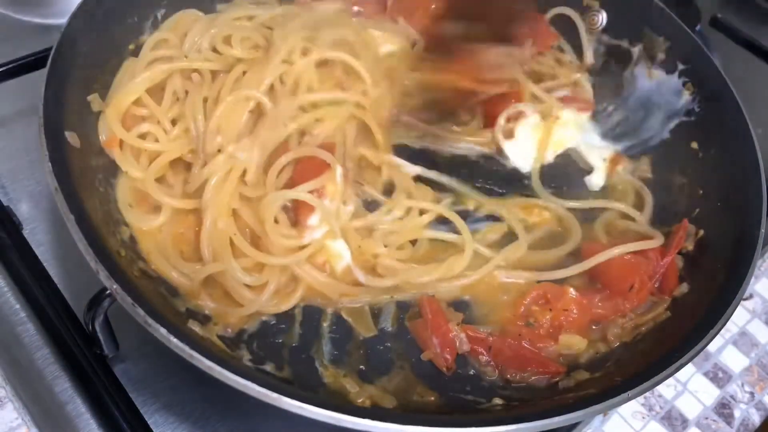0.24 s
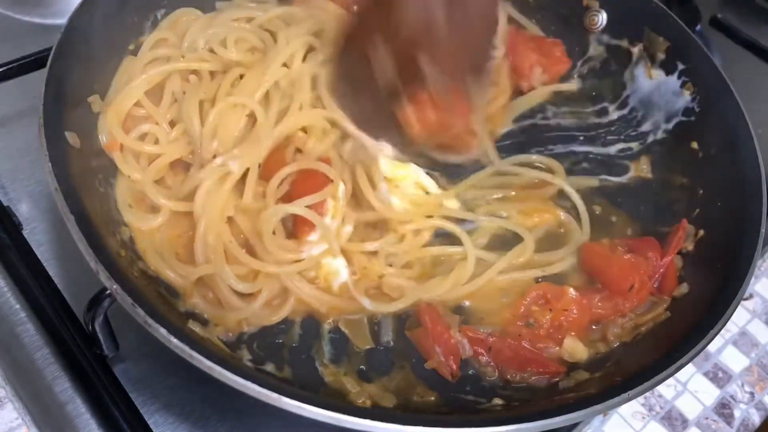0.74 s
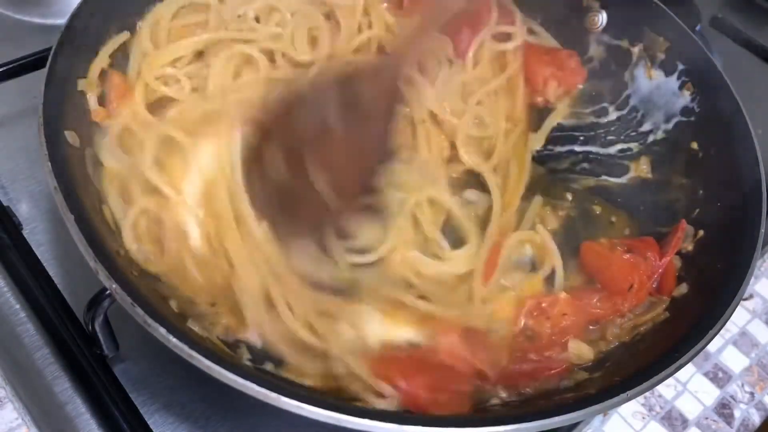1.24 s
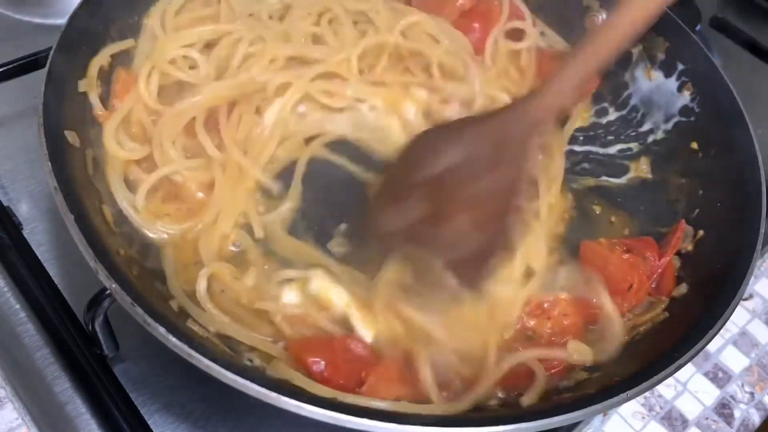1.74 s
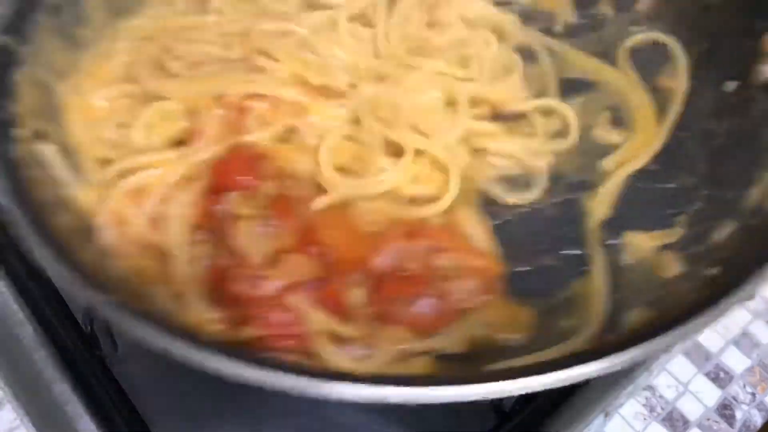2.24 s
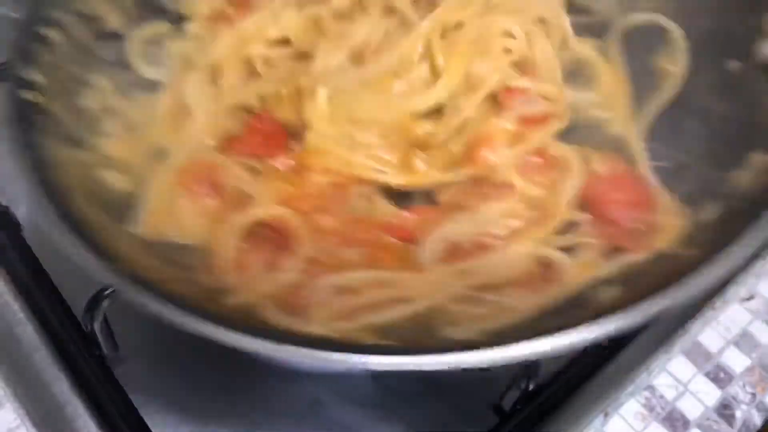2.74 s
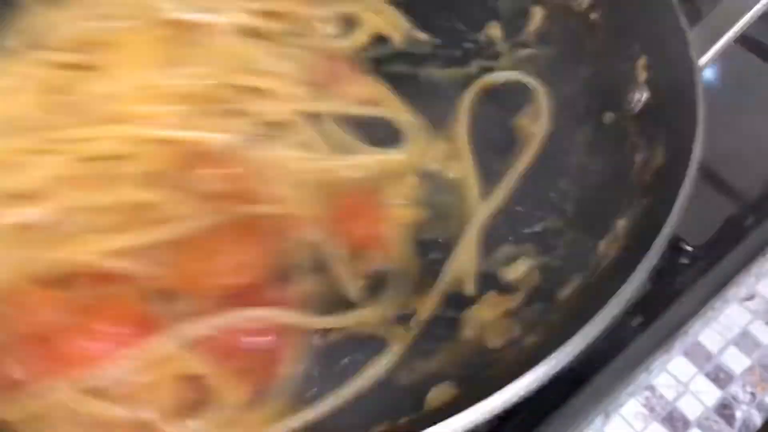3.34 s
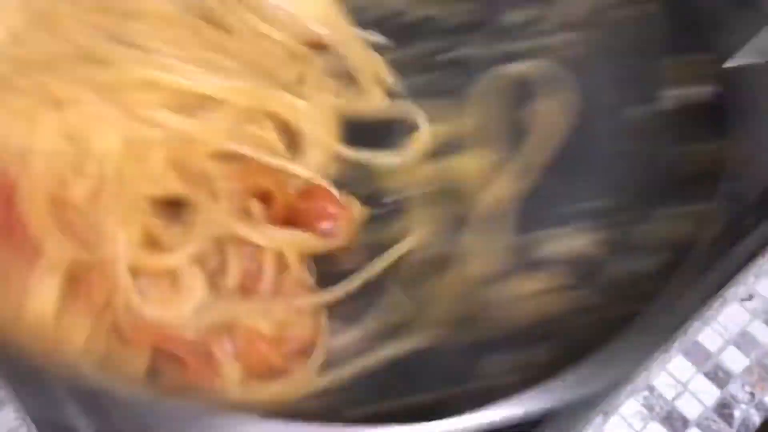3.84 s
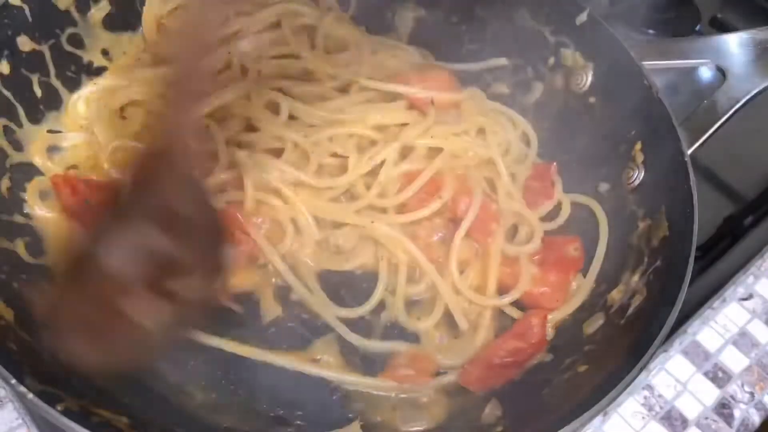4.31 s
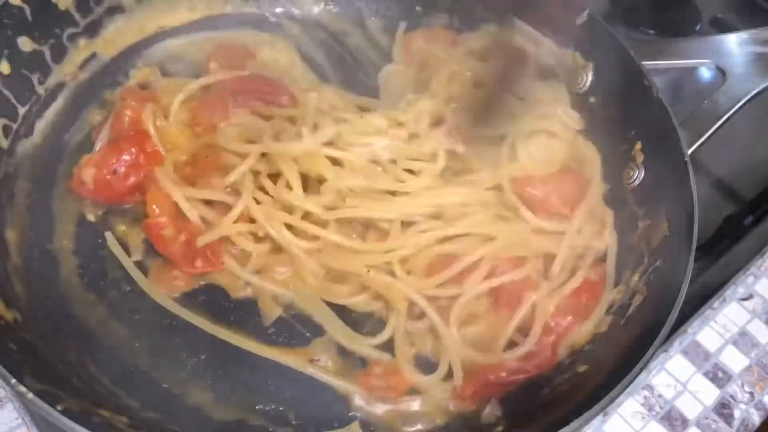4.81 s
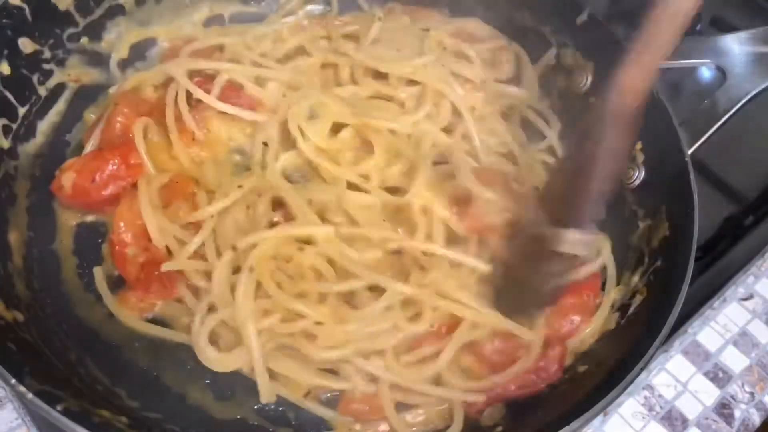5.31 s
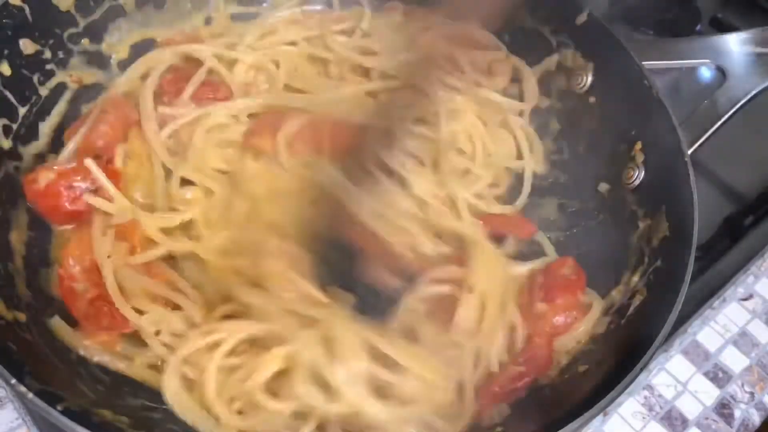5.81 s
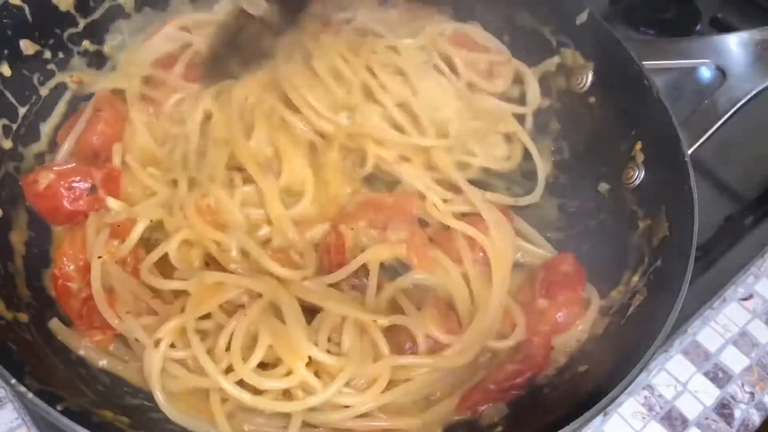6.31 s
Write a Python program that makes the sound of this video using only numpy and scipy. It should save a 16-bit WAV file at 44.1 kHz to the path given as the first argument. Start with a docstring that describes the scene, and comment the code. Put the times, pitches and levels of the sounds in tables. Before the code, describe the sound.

Close up in a small, hard kitchen, a wooden spoon stirs wet spaghetti in a frying pan. Sticky crackles and small smacks mix with hollow knocks and juddering scrapes. The pan is then jerked repeatedly, the pasta sliding and landing in loud wet swishes and slaps. A knock and ringing sweep round the wall follow, then quieter squelching stirs and a crisp woody tap near the end.

```python
"""On a kitchen hob, spaghetti in tomato sauce is stirred with a wooden spoon and tossed in a frying pan.
The wet strands crackle, smack and slap down: many tiny bursts of sound, merging into a swish of noise.
The spoon knocks on the pan and judders over its bottom: dying sine waves and short rattles of noise.
A small hard kitchen answers with dense, quickly fading echoes, over a faint low drone."""
import sys
import numpy as np
from scipy import signal
from scipy.fft import rfft, irfft
from scipy.io import wavfile
from scipy.ndimage import uniform_filter1d

SR = 44100
rng = np.random.default_rng(int(sys.argv[2]) if len(sys.argv) > 2 else 0)


def unload_audio(sound):
    """Save the sound as a 16-bit wav file, at the path given as the first command line argument."""
    columns = np.transpose(np.atleast_2d(sound))
    # keep every value between -1 and 1, then stretch to whole-number steps
    steps = np.round(np.clip(columns, -1, 1) * 32767)
    wavfile.write(sys.argv[1], SR, steps.astype(np.int16))


N = 289294
TIME = np.arange(N) / SR  # seconds

# Still air. Each row: frequency in Hz, relative strength in dB per Hz.
AIR_COLOUR = [(20, -14), (60, -13), (150, 13.5), (400, -1.5), (700, 13), (1500, 3), (4000, -4.5),
              (10000, -20), (16000, -6)]
# Low rumble. Each row: frequency in Hz, relative strength in dB per Hz.
RUMBLE_COLOUR = [(20, -43), (40, -1), (60, -7.5), (90, 3.5), (130, -7), (200, -3), (350, -7.5), (700, -30),
                 (2000, -75)]
# The pan shifts on the hob. Each row: start in seconds, length in seconds, rumble level in dB.
SHIFTS = [(0.456, 0.11, -51), (0.843, 0.31, -61.5), (1.493, 0.19, -60), (1.854, 0.6, -61.5),
          (4.696, 0.023, -58.5)]
# The pan drags on its support with a low groan.
# Each row: start in seconds, length in seconds, level in dB, first and last pitch in Hz (before it trembles).
GROANS = [(0.833, .01, -52, 160, 144), (0.95, 0.056, -49, 78, 85.7), (1.092, .2, -55.5, 91, 98),
          (1.832, 0.23, -55.5, 222, 209.3)]
# The wet sauce. Each row: frequency in Hz, relative strength in dB per Hz.
SAUCE_COLOUR = [(150, -7), (400, -19.5), (800, -5.5), (1400, 3), (2500, 1.5), (4000, 3), (7000, 4.5),
                (11000, 5), (14000, 0.5), (16500, -35)]
# The spoon pushes through the strands; thin films sound brighter than the heavy mass.
# Each row: start in seconds, length in seconds, relative level in dB, treble tilt in dB per octave.
STIRS = [(0.414, 0.039, -46.5, -16), (0.444, 0.16, -53, -7.5), (0.792, 0.033, -47.5, -2.5),
         (0.932, 0.29, -54, -5), (1.252, 0.15, -49.5, -4.5), (1.492, 0.0063, -45, -6),
         (1.575, 0.16, -56, -4.5), (2.562, 0.16, -53.5, -5), (4.27, 0.42, -56, -7.5),
         (4.525, 0.12, -53.5, -2.5), (4.906, 0.11, -49.5, -5), (5.169, 0.0024, -42, -5.5),
         (5.215, 0.44, -59.5, -4.5), (5.418, 0.033, -47.5, 0), (5.633, 0.39, -59, -2),
         (5.862, 0.011, -46.5, 9), (6.058, 0.088, -55.5, -7), (6.16, 0.031, -53, -6),
         (6.263, 0.019, -43.5, -3), (6.419, 0.086, -53, -4)]
# The pan is jerked and the whole mass slides off or lands, then the strands settle.
# Each row: start in seconds, length in seconds, relative level in dB, treble tilt in dB per octave,
# relative level of the settling in dB.
TOSSES = [(1.999, 0.017, -42, -4, -46.5), (2.199, 0.091, -43, -8, -80), (2.52, 0.011, -41.5, -5.5, -54),
          (2.722, 0.037, -35, -5.5, -53), (3.009, 0.012, -50, -7, -42), (3.145, 0.092, -42, -8, -49.5),
          (3.446, 0.038, -38.5, -4.5, -44), (3.636, 0.05, -37.5, -8.5, -48.5), (3.92, 0.02, -40.5, -6, -85)]
# Single large sauce films and air pockets that burst.
# Each row: time in seconds, relative level in dB, pitch in Hz.
SMACKS = [(.044, -21.5, 4200), (.0445, -28.5, 1840), (.1832, -25, 6900), (.192, -24.5, 4200),
          (.4195, -21.5, 6530), (.4215, -19.5, 3380), (.7801, -30.5, 6600), (.8, -22, 12500),
          (.8287, -27.5, 4400), (.8465, -25.5, 4830), (.9874, -31.5, 4400), (1.2892, -21.5, 9000),
          (1.3222, -30, 2270), (1.3567, -31, 2640), (1.494, -30, 4420), (1.5888, -20.5, 7000),
          (1.5918, -22.5, 6100), (1.983, -26, 7000), (2.002, -18, 10000), (2.068, -28.5, 3550),
          (2.219, -20.5, 8300), (2.2505, -18.5, 2820), (2.2678, -11, 7070), (2.498, -28, 10300),
          (2.513, -28.5, 4760), (2.7337, -18, 3930), (2.7468, -17.5, 5500), (2.995, -29, 11700),
          (3.0006, -27.5, 3270), (3.0127, -23.5, 10500), (3.1445, -24, 1890), (3.156, -22, 2150),
          (3.2344, -13.5, 5150), (3.2364, -12.5, 10400), (3.438, -18, 5750), (3.458, -17, 5140),
          (3.461, -26, 488), (3.473, -17.5, 6750), (3.61, -23.5, 3030), (3.6274, -32, 4370),
          (3.6505, -20.5, 3270), (3.682, -17, 2520), (3.899, -28, 11200), (3.93, -18.5, 4750),
          (3.945, -30.5, 450), (4.173, -17.5, 2720), (4.463, -28.5, 1850), (4.583, -29.5, 3460),
          (4.916, -26.5, 2240), (5.171, -23, 6850), (5.4518, -23.5, 1560), (5.611, -28.5, 6560),
          (6.1844, -24.5, 9000)]
# The pan, damped by the food and the spoon.
# Each row: basic frequency in Hz, relative level in dB, basic time to fade by 60 dB in seconds.
PAN_MODES = [(555, -29.5, 0.26), (536, -4.5, 0.032), (690.9, 3, 0.13), (775, 9.5, 0.017), (903, 1.5, 0.055),
             (896.6, -9.5, 0.16), (1354, -12.5, 0.039), (1503, -8, 0.032), (2290, -24, 0.02),
             (3220, -17, 0.0082)]
# The free wall of the pan sings on.
# Each row: basic frequency in Hz, relative level in dB, basic time to fade by 60 dB in seconds.
RIM_MODES = [(317.5, -6.5, 0.4), (558, -9.5, 0.35), (694, 1, 0.5), (897, -1.5, 0.59), (992, -11, 0.65),
             (1107, -7.5, 0.27), (1282, -1, 0.14), (1373, -3.5, 0.18), (1470, -12, 0.21), (1630, -7, 0.25),
             (2100, -17, 0.38)]
# The hob under the pan. Each row: frequency in Hz, relative level in dB, time to fade by 60 dB in seconds.
HOB_MODES = [(70, -14, 0.7), (99, -10, 0.48), (134.8, -5, 0.3), (183.6, 11.5, 0.04), (309.7, -5.5, 0.18)]
# The pan's pitch follows where the food lies and whether it rests on the hob.
# Each row: time in seconds, pitch ratio.
PAN_PITCH = [(.45, 1.0), (1.3, 1.025), (1.75, 1.025), (3.1, 1.2), (4.2, 1.0), (5.35, .95), (5.85, 1.01)]
# Spoon or landing pasta against the pan.
# Each row: time in seconds, pan ring in relative dB, crack in relative dB, crack pitch in Hz,
# crack time scale in seconds (it peaks after half of it), clatter and thump into the hob in relative dB.
KNOCKS = [(.0974, -27, -27, 940, 0.0035, -29.5, -32.5), (.4124, -15, -13, 2340, 0.00072, -20, -26.5),
          (.4205, -19.5, -26.5, 530, 0.0044, -31, -44), (1.2205, -34, -40, 1510, 0.0056, -52, -42.5),
          (1.431, -39.5, -65, 900, 0.0025, -49, -46), (1.6615, -31.5, -42, 794, 0.0054, -44, -73),
          (1.738, -61, -40, 840, 0.0033, -46, -67), (1.754, -66, -34, 716, 0.0048, -38.5, -80),
          (2.519, -48, -33, 960, 0.0048, -45, -60), (2.588, -61, -40.5, 840, 0.0035, -64, -47),
          (4.1726, -23.5, -23.5, 1187, 0.0071, -18, -28.5), (5.4365, -46.5, -37.5, 1320, 0.0022, -60, -62),
          (5.836, -18, -4, 1378, 0.0024, -8.5, -30.5), (5.8377, -40, -9, 727, 0.0038, -19, -40)]
# The wooden spoon rattling on metal. Each row: frequency in Hz, relative strength in dB per Hz.
CLATTER_COLOUR = [(100, 8), (250, -5.5), (550, 6.5), (1100, 3), (1800, -4), (2600, -9), (3500, -16.5),
                  (4600, -29), (9000, -34), (16000, -60)]
# The pan is knocked against its iron support, which clinks: time in seconds, relative level in dB.
CLINK = (.4195, -37.5)
# The support. Each row: frequency in Hz, relative level in dB, time to fade by 60 dB in seconds.
CLINK_MODES = [(3470, 15, 0.027), (4830, 2, 0.052), (6150, 8, 0.03)]
# The spoon drags over the pan bottom, or the pan over its support.
# Each row: start in seconds, length in seconds, level in dB, share of rasp from 0 to 1.
SCRAPES = [(0.123, 0.042, -37.5, 0.46), (0.462, 0.095, -40.5, 0.06), (0.804, 0.027, -54.5, 0.17),
           (1.094, 0.042, -55, 0), (1.227, 0.022, -43, 0.8), (1.256, 0.02, -45.5, 0.16),
           (1.294, 0.12, -58.5, 0.1), (1.465, 0.033, -42, 0), (1.5, 0.033, -36.5, 0.13),
           (1.531, 0.061, -46.5, 0.44), (1.6, 0.027, -54, 0), (1.7, 0.07, -50.5, 0.1),
           (3.44, 0.055, -43.5, 0.99), (3.925, 0.027, -46, 0.87), (3.956, 0.11, -56.5, 0.6)]
# A soft, dull wash of noise while the pan is lifted: start in seconds, length in seconds, level in dB.
WASH = (1.7, 2, -59.5)
# Soft wash. Each row: frequency in Hz, relative strength in dB per Hz.
WASH_COLOUR = [(40, -45), (150, 4), (400, -3.5), (750, 3.5), (1500, -4.5), (3500, -7), (8000, -15.5),
               (16000, -33)]
# The pan's ringing and its echoes drop suddenly in level.
# Each row: start in seconds, length in seconds, level change in dB.
DROPS = [(1.768, .2, -22)]
# The spoon sweeps once round the wall of the pan. Each row: time in seconds, level in dB.
SWEEP = [(4.175, -77), (4.21, -40), (4.26, -45), (4.295, -41), (4.33, -48.5), (4.41, -45), (4.475, -39.5),
         (4.52, -48.5), (4.625, -49.5), (4.67, -59)]
# The kitchen's echoes. Each row: frequency in Hz, time to fade by 60 dB in seconds.
ROOM = [(100, 0.79), (400, 0.91), (1000, 0.58), (3000, 0.44), (7000, 0.37), (10000, 0.28), (15000, 0.41)]


def amp(db):
    """Turns decibels into gain."""
    return 10 ** (np.asarray(db) / 20)


def unit(x):
    """Scales a signal to rms 1."""
    return x / np.sqrt(np.mean(x ** 2) + 1e-20)


def read(points, hz):
    """Reads a table between its rows, on a log-frequency axis."""
    f, value = np.transpose(points)
    return np.interp(np.log(hz + 1), np.log(f), value)


def add(mix, s, sound):
    """Mixes a sound in at time s, in seconds."""
    part = mix[max(round(s * SR), 0):][:len(sound)]
    part += sound[:len(part)]


def noise(colour):
    """Makes steady noise with a given spectrum, rms 1."""
    spectrum = rfft(rng.standard_normal(N))
    return unit(irfft(spectrum * amp(read(colour, np.fft.rfftfreq(N, 1 / SR))), N))


def wander(per_s):
    """Glides at random around zero, towards a new value per_s times a second, rms 1."""
    return unit(np.interp(TIME * per_s, np.arange(8192), rng.standard_normal(8192)))


def stroke(start_s, length_s, db, attack_s, release_s):
    """Gain over time of one movement: it swells up to its start, holds, and dies away."""
    gain = np.zeros(N)
    t = np.arange(max(-10 * attack_s, -start_s), length_s + 10 * release_s, 1 / SR)
    before, after = np.minimum(t, 0), np.maximum(t - length_s, 0)
    add(gain, start_s + t[0], amp(db) * np.exp(before / attack_s - after / release_s))
    return gain


def ring(modes, rise_s):
    """Dying sines of a struck body; neighbouring modes swing against each other."""
    t = np.arange(SR) / SR
    swing = np.zeros(SR)
    for k, (hz, db, t60) in enumerate(modes):
        swing += (-1) ** k * amp(db - 60 * t / t60) * np.sin(2 * np.pi * hz * t)
    # little sound leaves the body below its first listed mode
    radiation = signal.butter(2, modes[0][0], "high", fs=SR, output="sos")
    return signal.sosfilt(radiation, swing * (1 - np.exp(-t / rise_s)))


def bent(sound, start_s, wobble=0.0067, wobble_per_s=60):
    """Lets a ring follow the pan's pitch, which trembles under the shifting spoon and food."""
    at = np.arange(len(sound))
    pitch = np.interp(start_s + at / SR, *np.transpose(PAN_PITCH))
    ratio = pitch * (1 + wobble * wander(wobble_per_s)[:len(at)])
    return np.interp(np.cumsum(ratio), at, sound, right=0)


def burst(hz, cycles, glide):
    """A tiny cavity opens: a few cycles that swell, fade and may bend upward in pitch, energy 1."""
    t = np.arange(512) / SR
    age = t * hz / cycles
    pitch = np.minimum(hz * (1 + glide * (1 - np.exp(-age / 2))), SR / 2)
    wave = np.sin(2 * np.pi * np.cumsum(pitch) / SR) * age * np.exp(-age)
    return wave / np.linalg.norm(wave)


def background(air_db=-65, drone_db=-66, drone_hz=99, waver_per_s=16):
    """Still air as steady noise, and a faint low drone whose strength and phase waver."""
    turn = 2 * np.pi * drone_hz * TIME
    drone = wander(waver_per_s) * np.sin(turn) + wander(waver_per_s) * np.cos(turn)
    return amp(air_db) * noise(AIR_COLOUR) + amp(drone_db) * drone


def stove(resting_db=-65, shift_attack_s=0.043, shift_release_s=0.062,
          groan_attack_s=0.015, groan_release_s=0.046, grain_db=2):
    """Low rumble of the shifting pan, and the groans of its support as trembling sines."""
    power = amp(resting_db) ** 2
    for row in SHIFTS:
        power = power + stroke(*row, shift_attack_s, shift_release_s) ** 2
    out = np.sqrt(power) * noise(RUMBLE_COLOUR)
    for s, length, db, first_hz, last_hz in GROANS:
        hz = np.interp(TIME, [s, s + length], [first_hz, last_hz]) + 5 * wander(40)
        groan = amp(grain_db * wander(40.2)) * np.sin(2 * np.pi * np.cumsum(hz) / SR)
        out += stroke(s, length, db, groan_attack_s, groan_release_s) * groan
    return out


def working(idle_db=-65.5, idle_tilt_db=-4, stir_attack_s=0.005, stir_release_s=0.058,
            toss_attack_s=0.02, toss_release_s=0.0087, settling_s=0.097):
    """How hard the pasta is worked, and its treble tilt; stronger movements weigh more in the tilt."""
    moves = [(*row, stir_attack_s, stir_release_s) for row in STIRS]
    for s, length, db, tilt, settling_db in TOSSES:
        moves.append((s, length, db, tilt, toss_attack_s, toss_release_s))
        moves.append((s, length, settling_db, tilt, toss_attack_s, settling_s))
    power = np.full(N, amp(idle_db) ** 2)  # the sauce ticks on between strokes
    colour = power * idle_tilt_db
    for s, length, db, tilt, attack_s, release_s in moves:
        part = stroke(s, length, db, attack_s, release_s) ** 2
        power += part
        colour += part * tilt
    return np.sqrt(power), colour / power


def snapping_films(sliding, tilt_db, idle_per_s=2200, busy_per_s=12000, size_db=6.0,
                   size_rise_db=2.45, lump_db=3.5, lump_per_s=55, count=48):
    """Films of sauce snap at random as tiny bursts, in many sizes from low to high pitch."""
    per_s, films = idle_per_s + busy_per_s * sliding, np.zeros(N)
    for hz in np.geomspace(500, 15000, count):
        share = np.sqrt(hz / 4000) / count  # small cavities outnumber large ones
        at = np.flatnonzero(rng.random(N) < share / SR * per_s)
        uneven_db = size_db + size_rise_db * np.log2(hz / 4000)  # thin films differ most in strength
        luck = np.minimum(rng.exponential(size=8192)[at % 8192], 3.5)
        size = amp(uneven_db * luck) * (-1) ** at / amp(uneven_db)
        colour = amp(read(SAUCE_COLOUR, hz) + tilt_db[at] * np.log2(hz / 5000))
        snaps = np.zeros(N)
        snaps[at] = size * colour * np.sqrt(hz / share)
        snap = burst(hz, rng.uniform(0.5, 2.0), rng.uniform(0, 0.032))
        films += signal.oaconvolve(snaps, snap)[:N]
    films /= np.sqrt(abs(uniform_filter1d(films ** 2, size=1500)) + 1e-9)  # evens out the level
    return films * unit(amp(lump_db * wander(lump_per_s)))


def bubbling(patch_db, count=4, size=12):
    """Sauce noise whose brief resonances come and go, each at its own pitch."""
    z = signal.stft(noise(SAUCE_COLOUR), nperseg=256, noverlap=192)[2]
    patches = uniform_filter1d(rng.standard_normal(z.shape), size, 0)  # smooth over pitch
    patches = unit(uniform_filter1d(patches, count, 1))  # smooth over time
    return unit(signal.istft(z * amp(patch_db * patches), nperseg=256, noverlap=192)[1][:N])


def squelch(effort, tilt_db, rustle_db=-10, clump_db=3, clump_per_s=170, slide_db=-38, gain_db=-1):
    """Films snap in clumps over a soft rustle; when the whole mass slides they merge into a wet swish."""
    sliding = effort ** 2 / (effort ** 2 + amp(slide_db) ** 2)
    films = snapping_films(sliding, tilt_db)
    swish = bubbling(3.5)
    heavy = signal.sosfiltfilt(signal.butter(1, 5000, fs=SR, output="sos"), swish)
    swish = heavy * amp(-tilt_db) + (swish - heavy) * amp(tilt_db)
    clumps = unit(amp(clump_db * wander(clump_per_s)))
    wet = np.sqrt(1 - sliding) * films + np.sqrt(sliding + amp(rustle_db) ** 2) * swish
    return amp(gain_db) * effort * clumps * wet


def small_smacks(effort, per_s=14, at_db=-39, follow=0.97, scatter_db=2, centre_hz=7000, octaves=0.74):
    """Lesser films tear at random, louder as the pasta is worked harder: rows like those of SMACKS."""
    at = np.flatnonzero(rng.random(N) < per_s / SR)
    size, pitch = rng.standard_normal((N, 2))[at].T
    db = at_db + follow * 20 * np.log10(effort[at] / np.median(effort)) + scatter_db * size
    return list(zip(at / SR, db, np.clip(centre_hz * 2 ** (octaves * pitch), 1500, 14000)))


def smacks(rows, gain_db=10, snap_db=-18, snap_hz=11500, after_db=-11, after_s=0.0026, lead_s=0.0018,
           spread_octaves=0.58, count=8):
    """A larger film tears: a bright snap and a sharp burst amid a few smaller ones of scattered pitch."""
    out = np.zeros(N)
    for s, db, hz in rows:
        smack = np.zeros(2048)
        snap = amp(snap_db) * min(hz / 6000, 1) * burst(snap_hz, 0.56, 0)
        add(smack, lead_s, burst(hz, 0.62, 0) + snap)
        for wait, detune in zip(rng.exponential(after_s, count), rng.standard_normal(count)):
            small_hz = np.clip(hz * 2 ** (spread_octaves * detune), 900, 15000)
            add(smack, wait, amp(after_db) * burst(small_hz, 0.99, 0.12))
        add(out, s - lead_s, amp(db + gain_db) * smack / np.linalg.norm(smack))
    return out


def nudged(food):
    """The moving pasta rings the pan too, at its pitch of the moment."""
    body, times = ring(PAN_MODES, 0.00096), np.transpose(PAN_PITCH)[0]
    body = body[:SR // 4] / abs(rfft(body)).max()
    out = np.zeros(N)
    for s, share in zip(times, np.eye(len(times))):  # fades from one pitch to the next
        out += signal.oaconvolve(food * np.interp(TIME, times, share), bent(body, s))[:N]
    return out


def knocks(rim_db=-23, clatter_rise_s=0.00042, clatter_s=0.0052, corner_hz=1200, corner_db=4.0):
    """The spoon's short woody crack and clatter, the pan's ring, and a thump that passes into the hob."""
    out, t, rattle = np.zeros(N), np.arange(SR) / SR, noise(CLATTER_COLOUR)
    pan = ring(PAN_MODES, 0.0058) + amp(rim_db) * ring(RIM_MODES, 0.00273)
    hob = ring(HOB_MODES, 0.021)
    for k, (s, ring_db, crack_db, hz, crack_s, clatter_db, thump_db) in enumerate(KNOCKS):
        age = t / crack_s
        crack = 2 * age * np.exp(1 - 2 * age) * np.sin(2 * np.pi * hz * t)
        # a hard, clean blow rattles higher
        low_hz = np.clip(corner_hz * 2 ** ((crack_db + 12.0) / corner_db), 60, 1150)
        clatter = np.roll(rattle, k * N // len(KNOCKS))[:SR]  # another stretch of noise for each blow
        clatter = clatter * np.minimum(t / clatter_rise_s, 1) * np.exp(-t / clatter_s)
        clatter = signal.sosfilt(signal.butter(4, low_hz, "high", fs=SR, output="sos"), clatter)
        blow = amp(ring_db) * bent(pan, s) + amp(crack_db) * crack
        add(out, s, blow + amp(clatter_db) * clatter + amp(thump_db) * hob)
    add(out, CLINK[0], amp(CLINK[1]) * ring(CLINK_MODES, 0.00076))
    return out


def scrapes(slips_per_s=1500, size_db=1.5, bright_db=7.0, damping=0.99, low_hz=450, high_hz=1900,
            hiss_db=-17, attack_s=0.003, release_s=0.0014):
    """Wood sticks and slips on the pan; slips ring the pressed metal and rasp, and smeared sauce hisses."""
    slips = (rng.random(N) < slips_per_s / SR) * amp(size_db * rng.standard_normal(N))
    modes = [(hz, db + bright_db * np.log2(hz / 700), t60 / damping) for hz, db, t60 in PAN_MODES]
    judder = bent(unit(signal.oaconvolve(slips, ring(modes, 0.005))[:N]), 0)
    rasp = noise(CLATTER_COLOUR) * uniform_filter1d(slips, size=120)
    band = signal.butter(2, [low_hz, high_hz], "band", fs=SR, output="sos")  # sauce softens the rub
    rasp = unit(signal.sosfilt(band, rasp)) + amp(hiss_db) * noise(SAUCE_COLOUR)
    out = np.zeros(N)
    for s, length, db, share in SCRAPES:
        share = np.clip(share, 0, 1)
        rub = np.sqrt(1 - share) * judder + np.sqrt(share) * rasp
        out += stroke(s, length, db, attack_s, release_s) * rub
    return out


def soft_wash(attack_s=0.32, release_s=0.056, sway_db=2.5, sway_per_s=9):
    """A soft, dull wash of noise while the pan is lifted; its level sways gently."""
    return stroke(*WASH, attack_s, release_s) * noise(WASH_COLOUR) * amp(sway_db * wander(sway_per_s))


def level_drop(attack_s=0.0026, release_s=0.039):
    """Gain over time: the pan's ringing and echoes are cut short."""
    return amp(sum(db * stroke(s, length, 0, attack_s, release_s) for s, length, db in DROPS))


def sweep(damping=2.3, rasp_db=-3, hiss_db=-17, low_hz=420, high_hz=2400, grabs_per_s=260, grain_db=2):
    """One long, unevenly grabbing rub keeps the pan's wall singing under a soft rasp and sauce hiss."""
    wall = ring([(hz, db, t60 / damping) for hz, db, t60 in RIM_MODES], 0.001)
    grip = amp(grain_db * wander(grabs_per_s))
    song = unit(signal.oaconvolve(grip * rng.standard_normal(N), wall)[:N])
    band = signal.butter(2, [low_hz, high_hz], "band", fs=SR, output="sos")
    rasp = unit(grip * signal.sosfilt(band, noise(CLATTER_COLOUR)))
    rub = unit(song + amp(rasp_db) * rasp + amp(hiss_db) * noise(SAUCE_COLOUR))
    return amp(np.interp(TIME, *np.transpose(SWEEP), left=-np.inf, right=-np.inf)) * rub


def kitchen(x, first_s=0.0023, count=3):
    """Dense reflections, each band dying at its own speed; their pattern turns steadily, once a second."""
    out = np.zeros(N)
    for k in range(count):
        taps = rng.choice([-1., 1.], SR) * (rng.random(SR) < 1 / 8) * (np.arange(SR) > first_s * SR)
        hz, t, z = signal.stft(taps, SR, nperseg=256)
        fade = amp(-60 * t / read(ROOM, hz)[:, None])
        tail = signal.istft(z * fade, SR, nperseg=256)[1]
        share = np.sqrt(2 / count) * np.cos(np.pi * (2 * TIME + k / count))
        out += signal.fftconvolve(x * share, tail / np.linalg.norm(tail))[:N]
    return out


def scene(food_room_db=-11.0, knock_room_db=-9, rub_room_db=-12, coupling_db=-2):
    """Food and pan close by, with the kitchen behind them."""
    effort, tilt_db = working()
    food = squelch(effort, tilt_db) + smacks(list(SMACKS) + small_smacks(effort)) + soft_wash()
    food += amp(coupling_db) * nudged(food)
    blows, rubs = knocks(), scrapes() + sweep()
    pan = blows + rubs + kitchen(amp(knock_room_db) * blows + amp(rub_room_db) * rubs)
    food_echo = amp(food_room_db) * kitchen(food)
    return (food + food_echo + level_drop() * pan + stove() + background())[None]


def record(dry, low_hz=38, high_hz=16200):
    """Rolls off the deepest bass and cuts the highest treble."""
    dry = signal.sosfilt(signal.butter(2, low_hz, "high", fs=SR, output="sos"), dry)
    treble_cut = signal.firwin(255, high_hz, window=("kaiser", 9), fs=SR)
    return signal.oaconvolve(dry, treble_cut[None], "same")


dry = scene()
out = record(dry)
unload_audio(out)
```